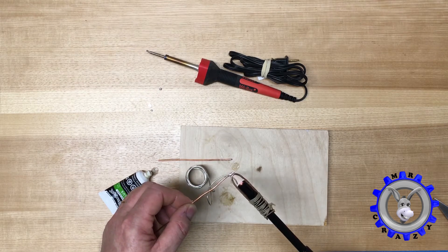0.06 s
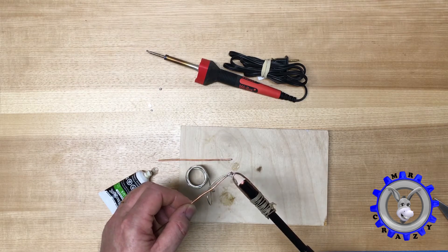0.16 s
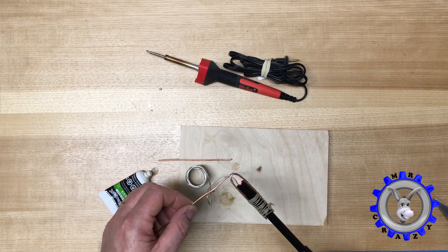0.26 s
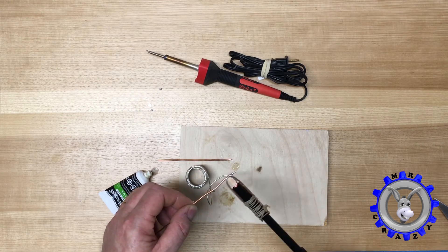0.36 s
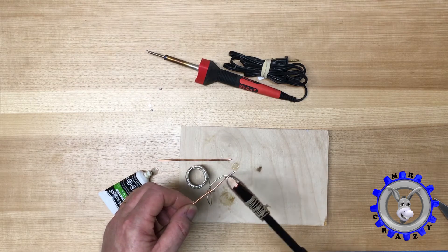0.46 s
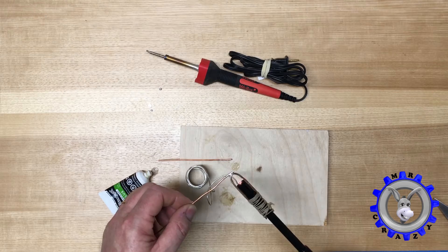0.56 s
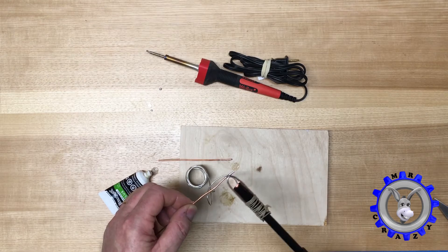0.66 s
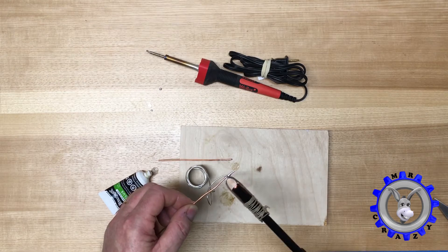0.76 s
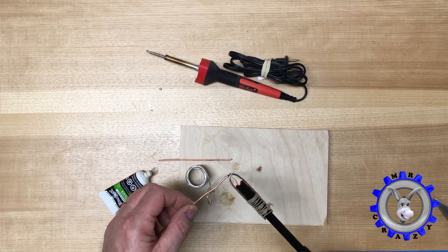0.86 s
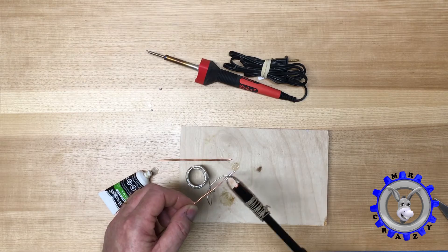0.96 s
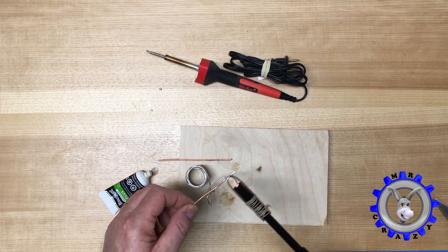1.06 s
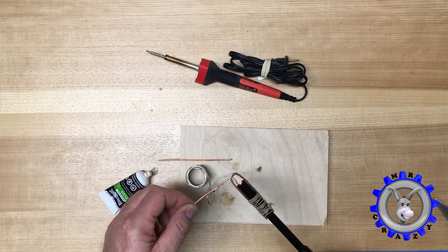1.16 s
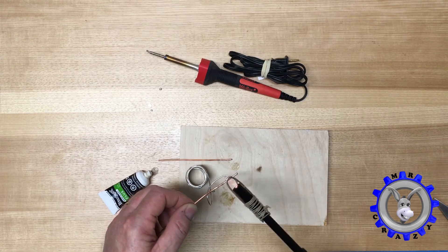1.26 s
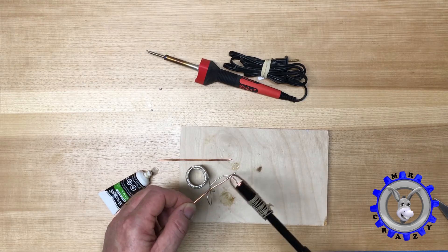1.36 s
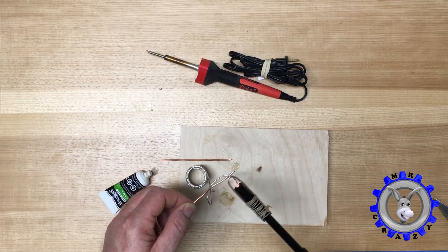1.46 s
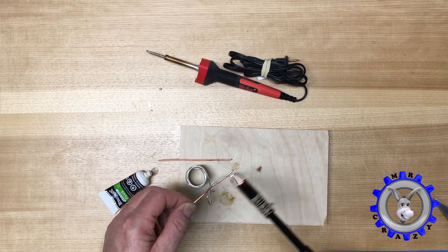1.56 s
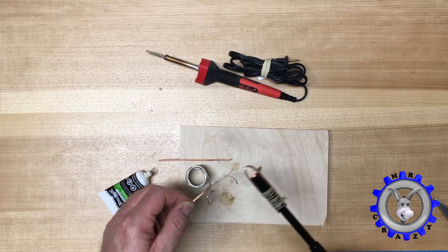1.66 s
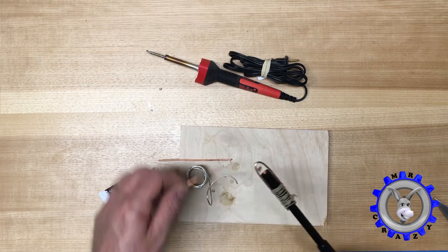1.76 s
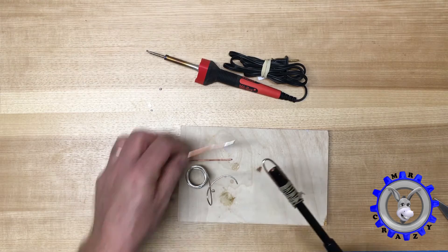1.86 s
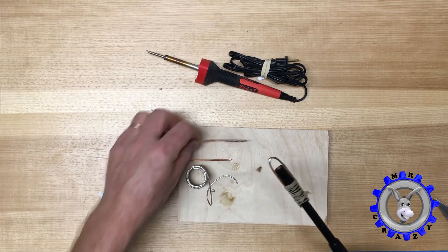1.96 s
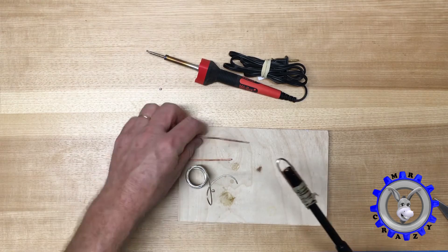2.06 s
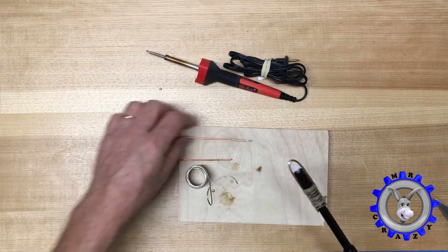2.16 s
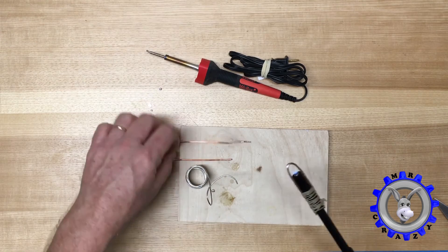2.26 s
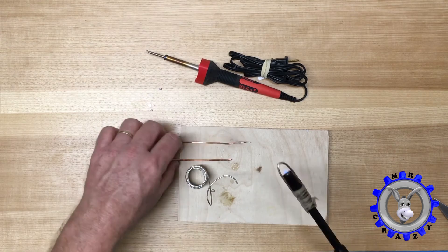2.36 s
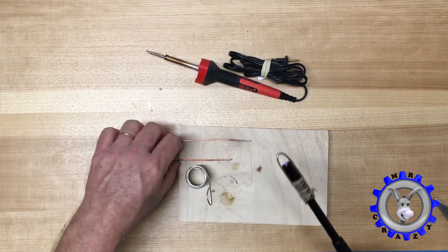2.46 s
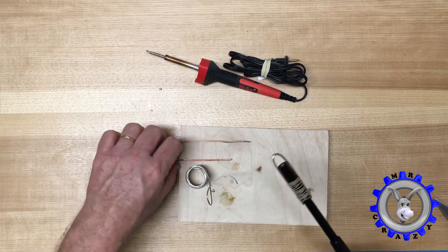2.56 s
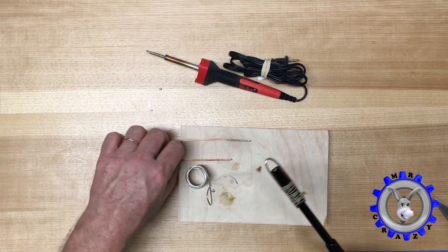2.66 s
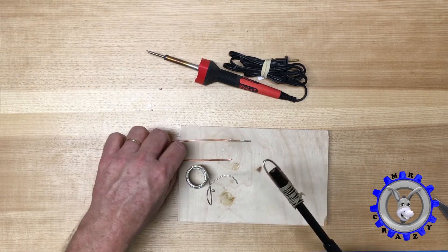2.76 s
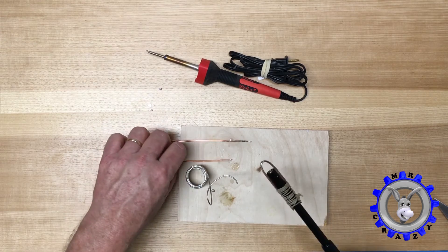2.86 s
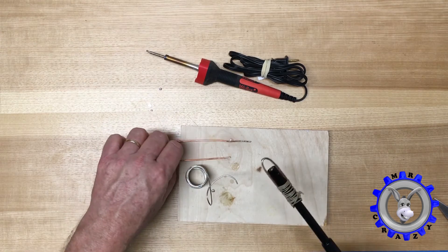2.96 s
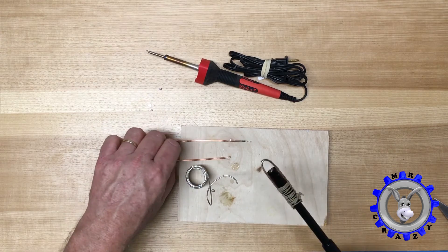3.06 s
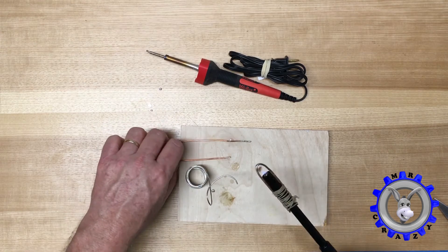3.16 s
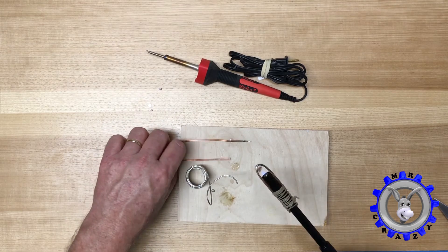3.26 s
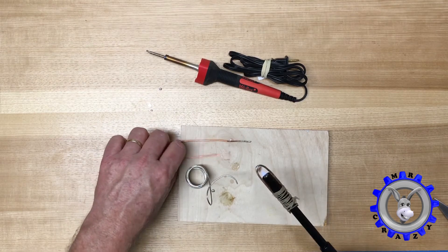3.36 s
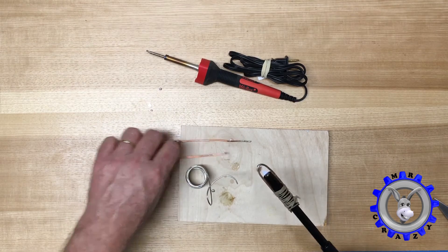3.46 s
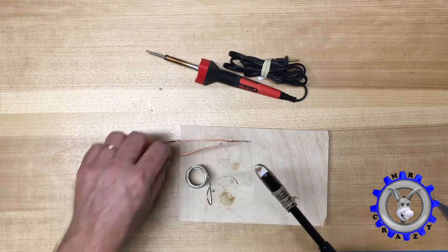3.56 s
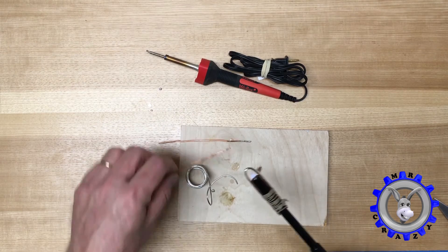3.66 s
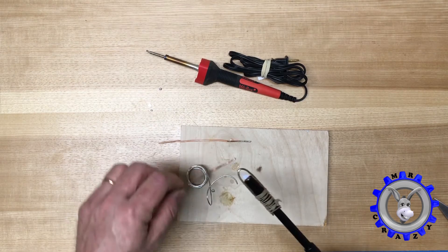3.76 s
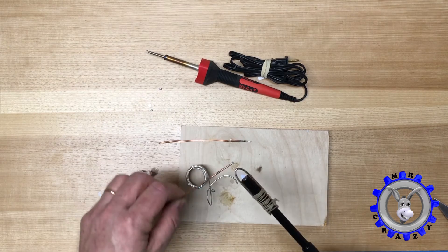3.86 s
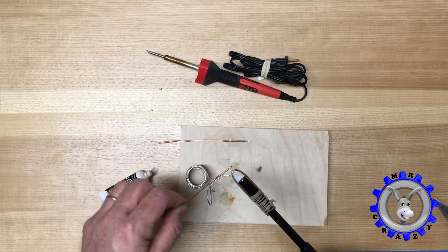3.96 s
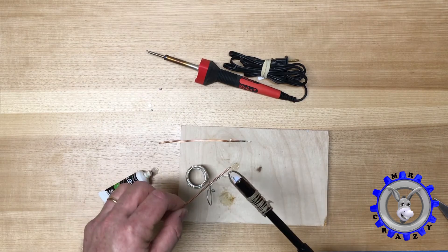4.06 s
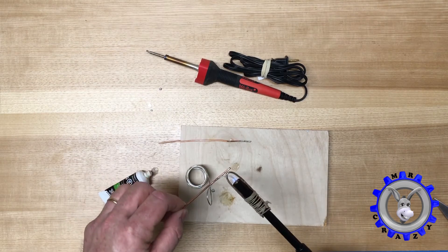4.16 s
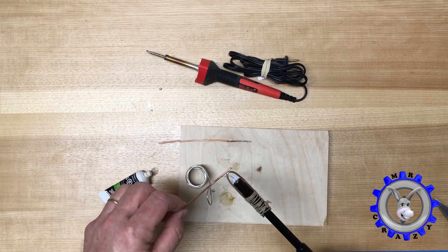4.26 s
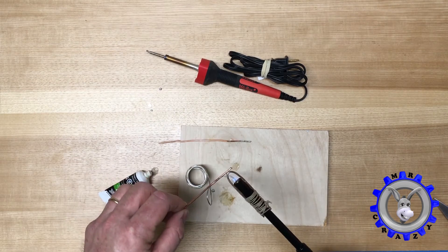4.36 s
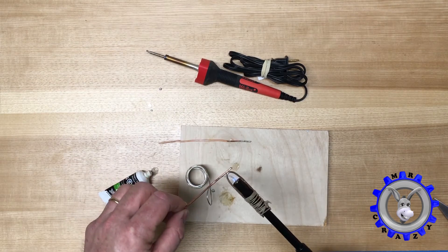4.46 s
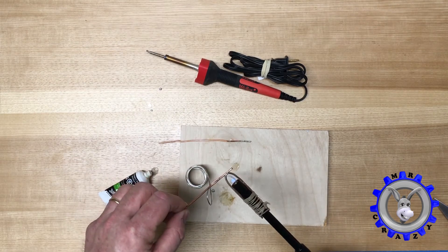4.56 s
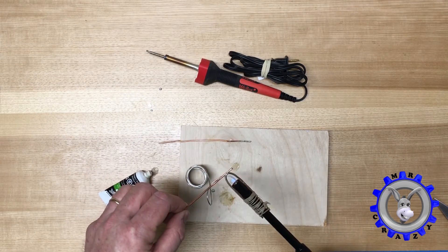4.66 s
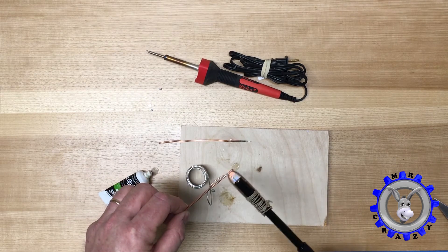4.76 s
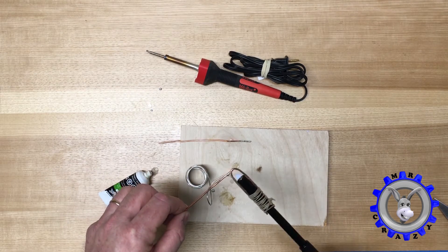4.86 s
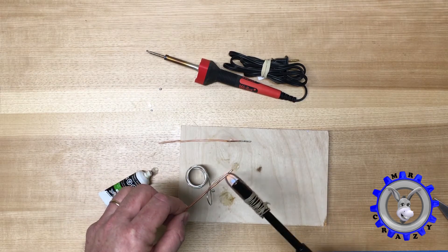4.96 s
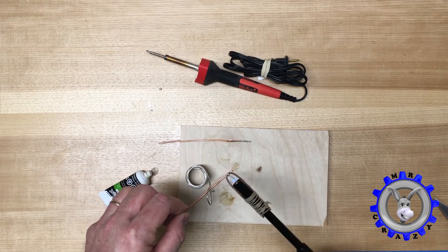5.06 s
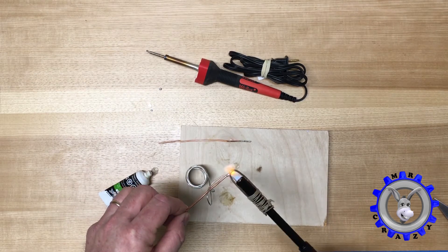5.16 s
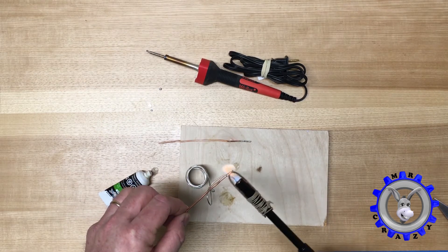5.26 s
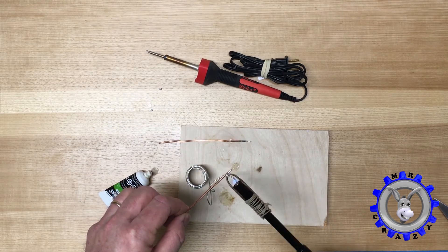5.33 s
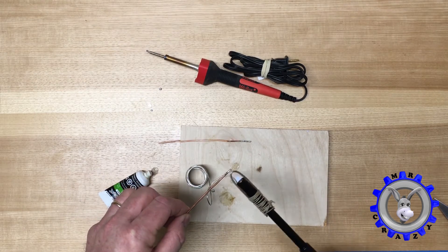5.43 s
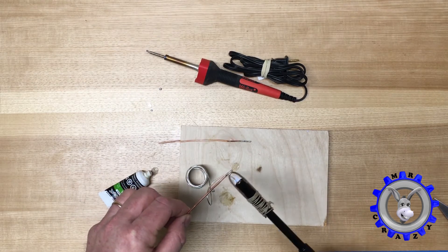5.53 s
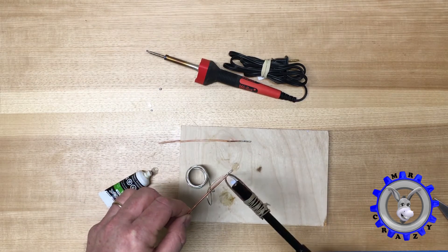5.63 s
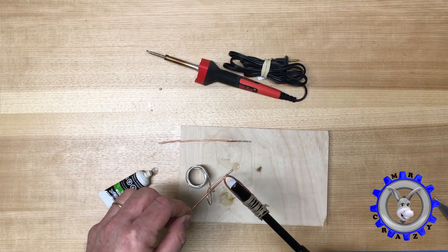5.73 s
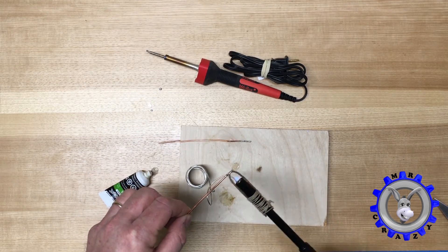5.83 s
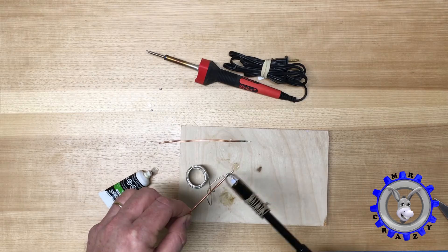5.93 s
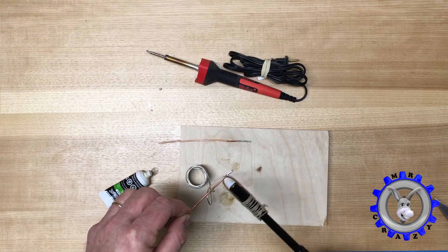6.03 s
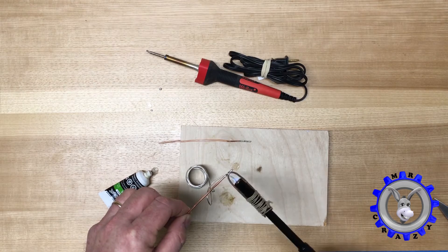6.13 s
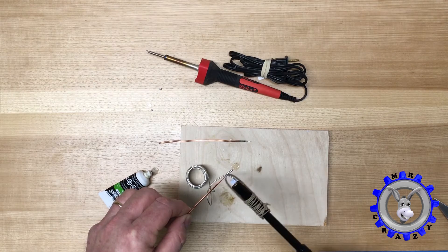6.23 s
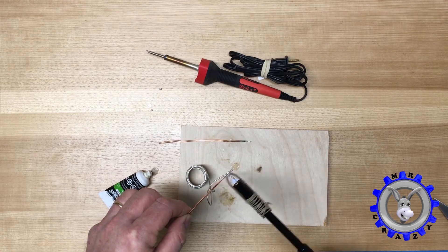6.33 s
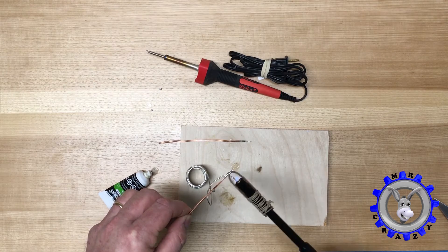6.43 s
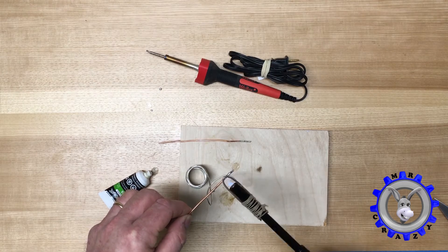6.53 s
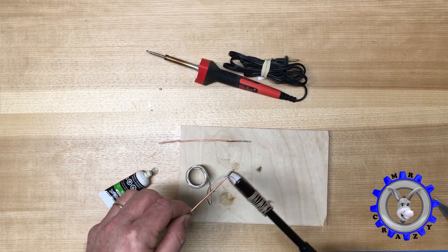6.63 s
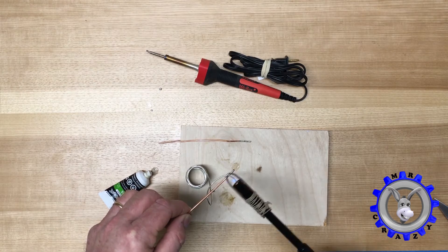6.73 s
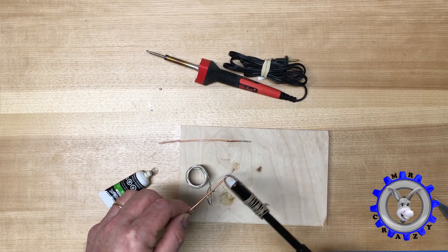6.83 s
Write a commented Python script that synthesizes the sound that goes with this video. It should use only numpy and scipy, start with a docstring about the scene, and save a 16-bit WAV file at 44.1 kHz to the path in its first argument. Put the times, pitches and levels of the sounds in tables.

```python
"""A butane jet lighter burns over a wooden table in a small room: shaped noise makes its roar and hiss. The jet
cuts out; filtered bursts make the clicks, and a flame sputters and dies as the trigger is let go with a low
thump. Unlit gas hisses, then a hard piezo snap, a noise crack with ringing sines, lights the lighter again. The
new flame flutters low and crackles with random bursts over the nozzle's whistle of narrow noise bands. Faint
bleeds, scuffs and low thumps sit around it, over quiet air and hum."""
import sys
import numpy as np
from scipy import signal
from scipy.fft import rfft, irfft, next_fast_len
from scipy.io import wavfile
from scipy.ndimage import uniform_filter1d, minimum_filter1d, map_coordinates

SR = 44100
rng = np.random.default_rng(int(sys.argv[2]) if len(sys.argv) > 2 else 0)


def wav_out(sig):
    """Save sig, one row per channel (or a flat mono array), as 16-bit PCM at SR to the path in sys.argv[1]."""
    wavfile.write(sys.argv[1], SR, np.round(np.clip(np.atleast_2d(sig).T, -1, 1) * 32767).astype(np.int16))


N = 303974
T = np.arange(N) / SR


def amp(db):
    """Decibels to gain."""
    return 10 ** (np.asarray(db) / 20)


def unit(x):
    """Scaled to rms 1."""
    return x / np.sqrt(np.mean(x ** 2) + 1e-20)


def along(points, hz):
    """(Hz, value) points read on a log frequency axis."""
    f, v = np.transpose(points)
    return np.interp(np.log(hz + 1), np.log(f + 1), v)


def curve(points, s):
    """(s, value) points joined by straight lines."""
    return np.interp(s, *np.transpose(points))


def wobble(rate):
    """A smooth random curve with rate knots a second."""
    knots = rng.standard_normal(int(N * rate / SR) + 4)
    return map_coordinates(knots, [T * rate])


def ramp(start, rise):
    """Climbs from 0 to 1 in rise seconds."""
    return np.clip((T - start) / rise, 0, 1)


def release(stop, t60):
    """Holds at 1 until stop, then falls 60 dB in every t60 seconds."""
    return np.exp(-np.log(1000) * np.maximum(T - stop, 0) / t60)


def strike(t, rise, t60):
    """Envelope of a blow: a quick rise and an exponential fall."""
    return (1 - np.exp(-t / rise)) * np.exp(-np.log(1000) * t / t60)


def swell(s, length):
    """Bell-shaped swell around time s; length is its standard deviation in seconds."""
    return np.exp(-.5 * ((T - s) / length) ** 2)


def bells(peaks, hz):
    """Summed dB of bell-shaped peaks and dips."""
    return sum(db / (1 + (2 * (hz - centre) / width) ** 2) for centre, width, db in peaks)


def comb(echoes, hz, dull_hz=9000):
    """dB ripple made by close echoes; the treble is reflected less."""
    reflected = sum(g * np.exp(-2j * np.pi * hz * ms / 1000) for ms, g in echoes)
    gain = abs(1 + reflected / np.sqrt(1 + (hz / dull_hz) ** 2))
    return 20 * np.log10(unit(gain) + 1e-3)


def coloured(x, db_of):
    """x through the causal minimum-phase filter whose dB at each frequency is db_of(Hz)."""
    m = 2 * next_fast_len(len(x) // 2 + 4096)
    gain = amp(db_of(np.fft.rfftfreq(m, 1 / SR)))
    cepstrum = irfft(np.log(gain + 1e-6), m)
    # folding the cepstrum forward makes the filter causal
    cepstrum[1:m // 2] *= 2
    cepstrum[m // 2 + 1:] = 0
    return irfft(rfft(x, m) * np.exp(rfft(cepstrum)), m)[:len(x)]


def noise(spectrum):
    """Noise of rms 1 with this spectrum."""
    return unit(coloured(rng.standard_normal(N), lambda hz: along(spectrum, hz)))


def narrow(centre_hz, width_hz):
    """Narrow-band noise of rms 1 whose centre may move."""
    lowpass = signal.butter(2, width_hz / 2, fs=SR, output="sos")
    band = signal.sosfilt(lowpass, rng.standard_normal((2, N)))
    phase = 2 * np.pi * np.cumsum(centre_hz * np.ones(N)) / SR
    return unit(band[0] * np.cos(phase) + band[1] * np.sin(phase))


def burst(t, rise, t60):
    """A dying noise burst of energy 1, its spectrum partly evened out like that of a sharp blow."""
    x = rng.standard_normal(len(t)) * strike(t, rise, t60)
    ripple_db = 20 * np.log10(abs(rfft(x)) + 1e-3)
    ripple_hz = np.fft.rfftfreq(len(t), 1 / SR)
    x = coloured(x, lambda hz: -.25 * np.interp(hz, ripple_hz, ripple_db))
    return x / np.linalg.norm(x)


def add(track, s, sound):
    """Mix a sound into the track at time s."""
    part = track[round(s * SR):][:len(sound)]
    part += sound[:len(part)]


# room peaks and dips at the microphone: (f/Hz, width/Hz, level/dB)
ROOM_PEAKS = [(208, 45, 1), (295, 39, -5.5), (359, 55, 4.5), (405, 40, -10.5), (461, 49, 3), (624, 60, 3),
              (885, 100, 9.5), (980, 55, -5.5), (1523, 140, 5.5), (1670, 106, -6.5), (1990, 250, 5),
              (3780, 51, 7), (4030, 55, 6)]


def over_table(x, echoes):
    """Close echoes comb the flame's sound, and the room colours it."""
    return coloured(x, lambda hz: comb(echoes, hz) + bells(ROOM_PEAKS, hz))


# decay time of the room's tail: (f/Hz, t60/s)
ROOM_DECAY = [(200, 0.26), (1500, 0.19), (4000, 0.24), (9000, 0.2), (16000, 0.14)]


def in_room(x, wet_db, wall_ms=12, wall_db=-9):
    """x plus one wall's echo and a short diffuse tail that fades at its own rate in each band."""
    hz, t, z = signal.stft(rng.standard_normal(SR // 3), SR, nperseg=256)
    fade = amp(-60 * t / along(ROOM_DECAY, hz)[:, None])
    tail = signal.istft(z * fade, SR, nperseg=256)[1]
    # silent for 2.6 ms, full after 5.2 ms
    tail *= np.clip(np.arange(len(tail)) / SR / 0.0026 - 1, 0, 1)
    tail /= np.linalg.norm(tail)
    # the wall's level is relative to the whole tail; wet_db then sets both
    tail[round(wall_ms * SR / 1000)] += amp(wall_db)
    return x + amp(wet_db) * signal.fftconvolve(x, tail)[:len(x)]


# spectra of the jet's roar and hiss, relative: (f/Hz, level/dB per Hz)
JET_ROAR_SPECTRUM = [(88, -48), (150, -17), (449, -6), (571, -13), (643, -5), (1520, -4.5), (2330, -7),
                     (2860, -3), (3630, -5.5), (3950, -9), (9000, -20.5), (11700, -43), (19800, -120)]
JET_HISS_SPECTRUM = [(3530, -38), (6000, -3.5), (6300, -10), (6930, 0.5), (7800, -14), (8400, -5.5),
                     (10500, -3.5), (11300, -0.5), (16000, -4.5)]
# the jet's treble hiss, before hiss_db: (t/s, level/dB)
JET_HISS_LEVEL = [(0.0, -56.5), (0.132, -55.5), (0.564, -58.5), (1.046, -60), (1.566, -57), (1.78, -58.5)]
# echoes off the table and nearby things: (delay/ms, strength)
JET_TABLE_ECHOES = [(0.697, 0.47), (1.04, 0.057), (1.52, 0.15), (2.7, 0.11)]
# the steady jet burns until its valve shuts, then dies quickly
JET_OUT_S, JET_T60_S, JET_ROAR_DB = 1.792, 0.13, -49.5


def jet(hiss_db=3):
    """A well-fed jet flame: even turbulent roar and nozzle hiss."""
    roar = amp(JET_ROAR_DB + 0.44 * wobble(24.9)) * noise(JET_ROAR_SPECTRUM)
    hiss = amp(hiss_db + curve(JET_HISS_LEVEL, T)) * noise(JET_HISS_SPECTRUM)
    burning = (roar + hiss) * release(JET_OUT_S, JET_T60_S)
    return in_room(over_table(burning, JET_TABLE_ECHOES), wet_db=-12.0)


# spectrum of the quiet air, relative: (f/Hz, level/dB per Hz)
AIR_SPECTRUM = [(20, -33), (45, 7), (65, -1.5), (90, -6.5), (170, -8), (260, -3), (330, -3), (480, -12.5),
                (800, -13), (1300, -15.5), (2500, -24), (5000, -30), (16000, -29)]
AIR_DB = -61.5


def room_tone(hum_hz=120, hum_db=-70.5, room_share=0.55):
    """Quiet room air, partly coloured by the room, with a faint mains hum of wandering level."""
    air = coloured(noise(AIR_SPECTRUM), lambda hz: room_share * bells(ROOM_PEAKS, hz))
    hum = unit(np.sin(2 * np.pi * hum_hz * T))
    return amp(AIR_DB) * unit(air) + amp(hum_db + 1.8 * wobble(2.1)) * hum


# the last gas in the pipe whistles faintly once the valve has shut: (t/s, f/Hz, level/dB before its fade)
PIPE_BLEEDS = [(1.82, 4350, -69), (2.61, 4720, -66.5)]
BLEED_WIDTH_HZ, BLEED_RISE_S, BLEED_T60_S = 350, 0.02, 0.81


def bleeds():
    """Thin whistles as the pipe empties: fading narrow noise bands."""
    out = np.zeros(N)
    for s, hz, db in PIPE_BLEEDS:
        envelope = ramp(s, BLEED_RISE_S) * release(s, BLEED_T60_S)
        out += amp(db) * envelope * narrow(hz, BLEED_WIDTH_HZ)
    return out


# clicks of trigger and case, and two sharp ticks as the flame meets the wire;
# a harder contact keeps more treble: (t/s, level/dB before crack_db, peak f/Hz, treble corner f/Hz)
SHARP_CLICKS = [(1.8415, -28, 3600, 9000), (1.9107, -39, 3600, 16000), (2.1477, -5.5, 2360, 10500),
                (2.2323, 3, 2160, 5600), (2.307, -18, 1500, 3480), (2.324, -9, 2030, 5350),
                (2.3326, -11.5, 2300, 4800), (2.352, -14, 1900, 4500), (2.3614, -25, 2300, 5000),
                (2.393, -18, 2200, 4000), (2.4237, -15, 2800, 4000), (2.678, -29.5, 1300, 18200),
                (2.7278, -27, 3600, 16000), (3.0157, -25, 3200, 6000), (3.047, -16.5, 1400, 6000),
                (3.0515, 0.5, 3450, 20000), (3.126, -12, 1300, 15000), (3.1304, -10.5, 3680, 8000),
                (4.947, -15, 3770, 10000), (4.958, -22, 3800, 11000)]
# spectral slope shared by all clicks: (f/Hz, level/dB)
CLICK_TILT = [(1000, 2.5), (16000, -3.5)]
# resonances of the plastic case: (f/Hz, width/Hz, level/dB)
CASE_PEAKS = [(1220, 130, 4.5), (2220, 130, 5.5), (2680, 200, 3.5), (3120, 190, 5), (3880, 240, 6),
              (5300, 440, 7), (6200, 510, -3), (8900, 880, 5), (11600, 930, 7)]
# delay of the table's echo as the handle moves: (t/s, delay/ms)
HANDLE_ECHO_DELAY = [(2.15, 0.71), (2.23, 0.525), (2.43, 0.496), (2.68, 0.65), (3.13, 0.7)]
CLICK_PEAK_WIDTH_HZ, CLICK_PEAK_DB = 960, 7.5


def case_colour(hz, low_hz):
    """dB of the plastic case: it resonates, and being small radiates little bass."""
    bass_loss = -10 * np.log10(1 + (low_hz / np.maximum(hz, 700)) ** 14)
    return along(CLICK_TILT, hz) + bells(CASE_PEAKS, hz) + bass_loss


def clicks(low_hz=1100, crack_db=-1, echo=0.27):
    """Each click or tick is a brief noise crack, coloured by the plastic case and combed by the table."""
    out, t = np.zeros(N), np.arange(SR // 3) / SR
    for s, db, pitch_hz, corner_hz in SHARP_CLICKS:
        peak = [(pitch_hz, CLICK_PEAK_WIDTH_HZ, CLICK_PEAK_DB)]
        table = [(curve(HANDLE_ECHO_DELAY, s), echo)]

        def colour(hz):
            """dB of this click: case, softness, own peak and table echo."""
            soft = -10 * np.log10(1 + (hz / corner_hz) ** 4)
            return case_colour(hz, low_hz) + soft + bells(peak, hz) + comb(table, hz)

        crack = coloured(burst(t, rise=0.00056, t60=0.014), colour)
        add(out, s, in_room(amp(db + crack_db) * crack, wet_db=-8.5))
    return out


# fingers scuff the wood: (t/s, f/Hz, length/s, level/dB)
FINGER_SCUFFS = [(2.101, 1870, .016, -63.5), (2.88, 1750, 0.01, -58), (2.938, 1670, 0.022, -58.5)]


def scuffs(width_hz=260):
    """Faint, short swells of friction in a narrow noise band."""
    return sum(amp(db) * swell(s, length) * narrow(hz, width_hz) for s, hz, length, db in FINGER_SCUFFS)


# centre of the nozzle's breathy whistle: (t/s, f/Hz)
WHISTLE_PITCH = [(2.58, 14200), (2.8, 13400), (3.0, 13300), (3.5, 14000), (4.6, 14450), (5.5, 14300),
                 (6.1, 13800), (6.8, 13400)]
# the whistle's strands, before whistle_db: (multiple of its centre, width/Hz, level/dB)
WHISTLE_STRANDS = [(1.083, 300, -10), (1.04, 350, -7), (1, 450, -3), (0.935, 350, -8), (0.9, 400, -7),
                   (0.828, 400, -9), (0.76, 400, -15.5), (0.64, 370, -14.5)]
# each press of the trigger lets gas out: (opens t/s, shuts t/s, rise/s, level/dB at the rest pitch)
TRIGGER_PRESSES = [(2.14, 2.595, 0.06, -58.5), (2.68, 3.015, 0.14, -53), (3.17, 6.95, 0.26, -57)]
# spectrum of the escaping gas, relative: (f/Hz, level/dB per Hz)
GAS_SPECTRUM = [(1500, -28), (2600, -7.5), (3600, -10.5), (4700, -11.5), (5400, -12), (7000, -12.5),
                (8200, -17), (8700, -12), (10400, -16), (11500, -16.5), (13500, -13.5), (16000, -12)]
VALVE_T60_S = 0.059
# faster gas whistles higher and hisses louder
WHISTLE_REST_HZ, GAS_DB_PER_OCTAVE = 14150, 34


def gas(whistle_db=-6, hiss_db=-3, waver=.006):
    """Gas hisses from the nozzle, with breathy whistling strands that drift with the flow."""
    pitch = curve(WHISTLE_PITCH, T)
    valve = sum(amp(db) * ramp(opens, rise) * release(shuts, VALVE_T60_S)
                for opens, shuts, rise, db in TRIGGER_PRESSES)
    flow = valve * amp(GAS_DB_PER_OCTAVE * np.log2(pitch / WHISTLE_REST_HZ))
    centre = pitch * (1 + waver * wobble(5))
    whistle = sum(amp(db + 2.3 * wobble(8.3)) * narrow(multiple * centre, width)
                  for multiple, width, db in WHISTLE_STRANDS)
    hiss = noise(GAS_SPECTRUM)
    return in_room(flow * (amp(whistle_db) * whistle + amp(hiss_db) * hiss), wet_db=-6.5)


# soft low thumps: knocks of the handle, and one as the trigger is let go: (t/s, level/dB, f/Hz, t60/s)
LOW_THUMPS = [(2.168, -42, 223, 0.061), (2.605, -45, 140, 0.065), (3.196, -29.5, 178, 0.041)]


def thumps():
    """Dull knocks of the handle and the released trigger: short, fading low sines."""
    out, t = np.zeros(N), np.arange(SR // 4) / SR
    for s, db, hz, t60 in LOW_THUMPS:
        add(out, s, amp(db) * np.sin(2 * np.pi * hz * t) * strike(t, rise=0.0008, t60=t60))
    return out


def crackle(rate, spread_db):
    """Random tiny bursts of the flame front, rate a second, of log-normal size with a ceiling."""
    chance, size = rng.random(N), rng.standard_normal(N)
    return (chance < rate / SR) * amp(spread_db * np.minimum(size, 1.7))


# the flame's loudest pops: (t/s, level/dB before POP_GAIN_DB)
FLAME_POPS = [(2.4755, -38), (2.589, -38), (3.5323, -35), (3.5668, -35.5), (3.614, -36.5), (3.731, -34.5),
              (3.8085, -32), (4.4289, -32.5), (4.9877, -35), (5.1148, -37), (5.2882, -29), (5.3662, -30),
              (5.9506, -34.5), (6.7976, -31)]
# colour of single pops and coarse crackle: (f/Hz, level/dB)
POP_COLOUR = [(40, -71), (200, -14), (800, -3.5), (1600, 1), (2200, -4), (2700, 3.5), (4000, -3),
              (5000, -7), (7000, -9.5), (11000, -23), (16000, -33)]
POP_GAIN_DB, POP_T60_S = 17.5, 0.005


def flame_pops():
    """Single pops of the flame: very short coloured bursts."""
    out, t = np.zeros(N), np.arange(SR // 50) / SR
    for s, db in FLAME_POPS:
        add(out, s, amp(db + POP_GAIN_DB) * burst(t, rise=0.00032, t60=POP_T60_S))
    return coloured(out, lambda hz: along(POP_COLOUR, hz))


# each burn of the unsteady flame: (lit t/s, out t/s, build-up/s)
FLAME_BURNS = [(2.254, 2.604, 0.27), (3.267, 6.95, 0.18)]
# the flame flares or falters for a moment: (t/s, length/s, level/dB)
FLAME_SURGES = [(3.857, 0.022, 2.5), (4.847, 0.029, -3.5), (6.08, 0.022, -3), (6.89, 0.025, 5.5)]
# spectra of the low flutter and rumble, relative: (f/Hz, level/dB per Hz)
FLUTTER_SPECTRUM = [(41, -50), (70, -16), (91, -26), (200, -2), (457, -3.5), (577, -28), (639, -5),
                    (800, -7.5), (1040, -31), (1760, -120)]
RUMBLE_SPECTRUM = [(20, -37), (45, 2.5), (90, -5), (170, 1.5), (260, -11), (600, -56)]
# colour of the fine crackle: (f/Hz, level/dB)
RASP_COLOUR = [(40, -75), (300, -16.5), (700, 0), (1400, 2.5), (1900, -1), (2200, -16), (2650, -3.5),
               (3800, -23), (5000, -21.5), (7000, -24.5), (10000, -47), (16000, -35)]
# echoes off the table and nearby things: (delay/ms, strength)
FLAME_TABLE_ECHOES = [(.29, .15), (.75, .33), (1.43, -0.11), (1.7, 0.12), (2.33, -0.11), (3.31, -0.22)]
# flutter and rasp levels before surges and unrest
FLAME_T60_S, FLUTTER_DB, RASP_DB = 0.12, -53.5, -54.5
# the flame rumbles until it settles on the wire; from then on it rasps harder
RUMBLE_FROM_S, RUMBLE_RISE_S, RUMBLE_T60_S, RUMBLE_DB = 3.56, 0.55, 2.2, -61.5
# the last two are gains added on the wire
ON_WIRE_S, SETTLE_S, ON_WIRE_RASP_DB, ON_WIRE_FLUTTER_DB = 4.9, 0.08, 2.5, 1


def flame():
    """A lifting, unsteady flame: low flutter, a rasp of tiny bursts and single pops."""
    surge_db = sum(db * swell(s, length) for s, length, db in FLAME_SURGES)
    lit = sum(ramp(start, build) * release(out, FLAME_T60_S) for start, out, build in FLAME_BURNS)
    burning = amp(surge_db) * lit
    on_wire = ramp(ON_WIRE_S, SETTLE_S)
    # one shared unrest moves flutter and rasp together
    unrest = wobble(70)
    flutter_level = burning * amp(FLUTTER_DB + ON_WIRE_FLUTTER_DB * on_wire + 0.92 * unrest)
    rasp_level = burning * amp(RASP_DB + ON_WIRE_RASP_DB * on_wire + unrest)
    rumble_level = amp(RUMBLE_DB) * ramp(RUMBLE_FROM_S, RUMBLE_RISE_S) * release(ON_WIRE_S, RUMBLE_T60_S)
    low = flutter_level * noise(FLUTTER_SPECTRUM) + rumble_level * noise(RUMBLE_SPECTRUM)
    fine = unit(coloured(crackle(rate=2500, spread_db=5.5), lambda hz: along(RASP_COLOUR, hz)))
    coarse = unit(coloured(crackle(rate=220, spread_db=6), lambda hz: along(POP_COLOUR, hz)))
    sputter = rasp_level * (amp(-1.5) * fine + amp(-5) * coarse)
    return in_room(over_table(low + sputter + flame_pops(), FLAME_TABLE_ECHOES), wet_db=-9.5)


# colour of the piezo crack, before crack_db: (f/Hz, level/dB)
SNAP_SPECTRUM = [(100, -33), (700, -18.5), (1150, -11), (1700, 2), (2000, 0), (2450, -4.5), (3000, 3.5),
                 (3350, 12.5), (3750, -1.5), (4200, 0), (5000, 0), (8800, -1), (10800, -4.5), (13000, 0.5),
                 (16000, -7)]
# the piezo hammer's ring, before ring_db: (f/Hz, level/dB, t60/s)
HAMMER_MODES = [(3130, -7, 0.1), (3340, -4, 0.11), (3380, -1, 0.074), (3410, -6.5, 0.18), (3540, -5, 0.2),
                (4130, -9, 0.13), (4700, -19, 0.11)]


def snap(s=3.1944, crack_db=15.0, ring_db=-19):
    """The spring hammer hits the piezo crystal: a hard crack and a short metal ring."""
    out, t = np.zeros(N), np.arange(SR // 2) / SR
    crack = coloured(burst(t, rise=0.00049, t60=0.024), lambda hz: along(SNAP_SPECTRUM, hz))
    ring = np.zeros(len(t))
    for hz, db, t60 in HAMMER_MODES:
        mode = np.sin(2 * np.pi * (hz * t + rng.random()))
        ring += amp(db) * mode * strike(t, 0.00044, t60)
    add(out, s, in_room(amp(crack_db) * crack, wet_db=-8.5) + amp(ring_db) * ring)
    return out


def scene():
    """All sources at one microphone."""
    steady = jet() + bleeds() + gas() + flame()
    brief = clicks() + scuffs() + thumps() + snap()
    return (steady + brief + room_tone())[None]


TOP_HZ = 15850


def record(dry):
    """A fast limiter holds peaks to 0.76; the recorder then cuts everything above its band limit."""
    needed = np.minimum(1, .76 / (abs(dry) + 1e-9))
    limited = dry * uniform_filter1d(minimum_filter1d(needed, size=61), size=61)
    m = next_fast_len(N + SR // 10)
    # a straight 200 Hz wide edge centred on TOP_HZ
    edge = np.clip((TOP_HZ - np.fft.rfftfreq(m, 1 / SR)) / 200 + .5, 0, 1)
    return irfft(rfft(limited, m) * edge, m)[:, :N]


dry = scene()
out = record(dry)
wav_out(out)
```